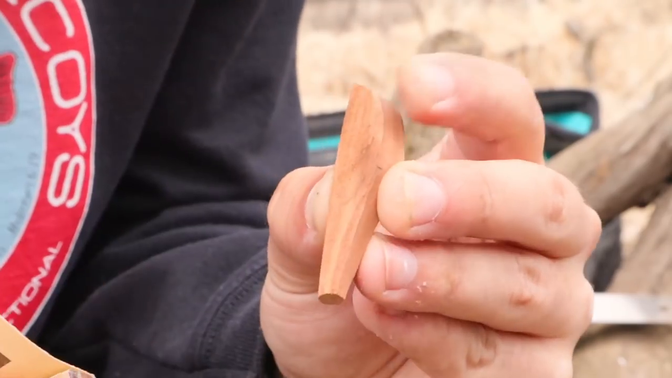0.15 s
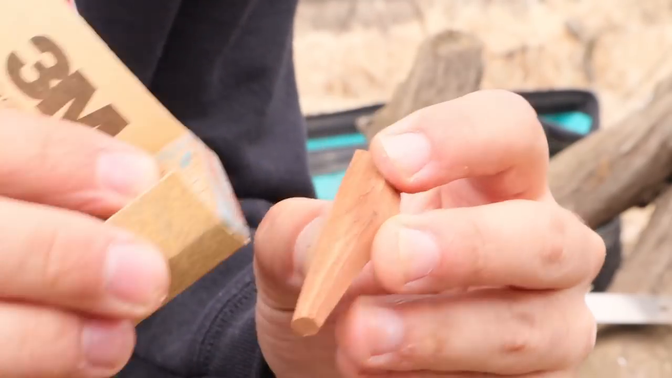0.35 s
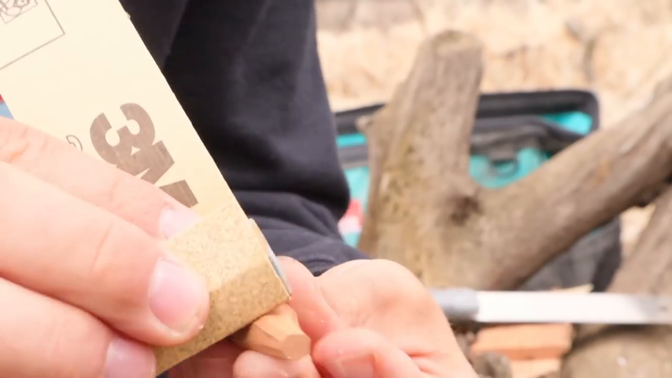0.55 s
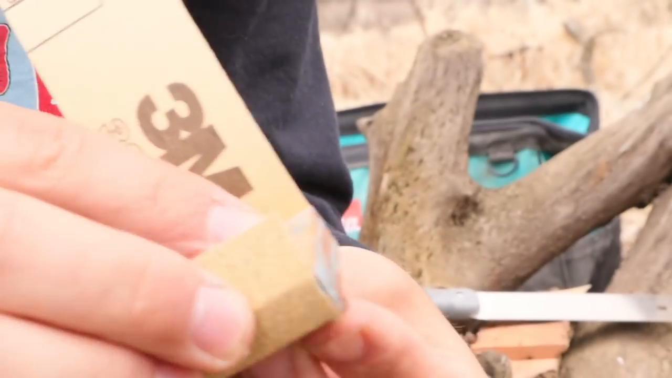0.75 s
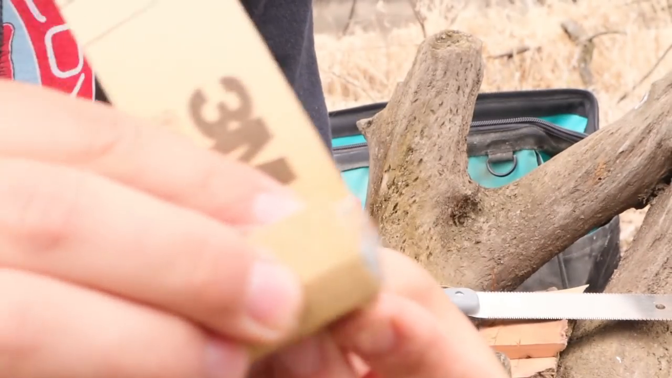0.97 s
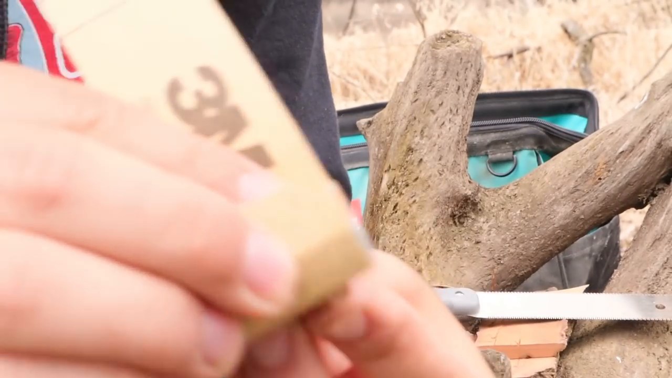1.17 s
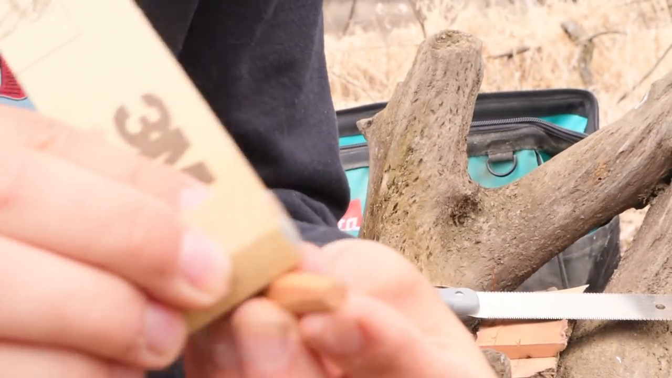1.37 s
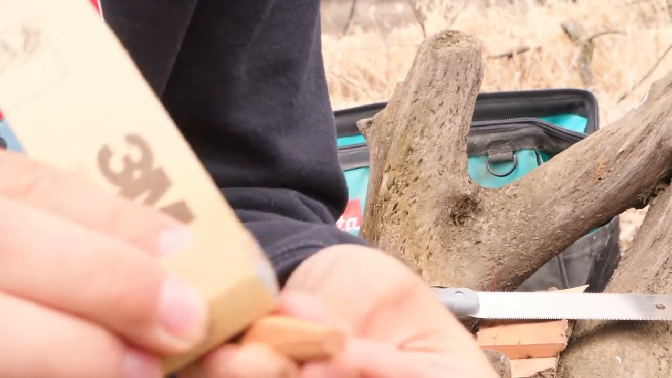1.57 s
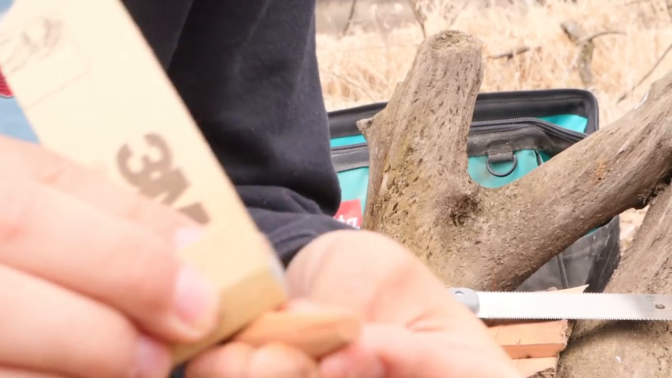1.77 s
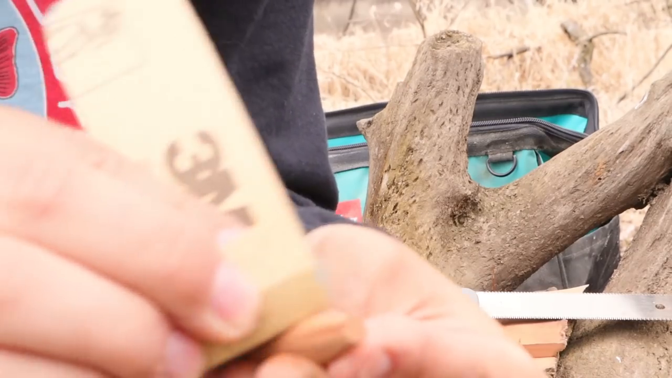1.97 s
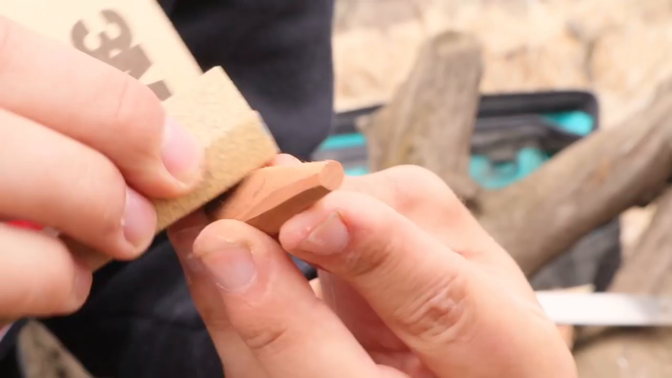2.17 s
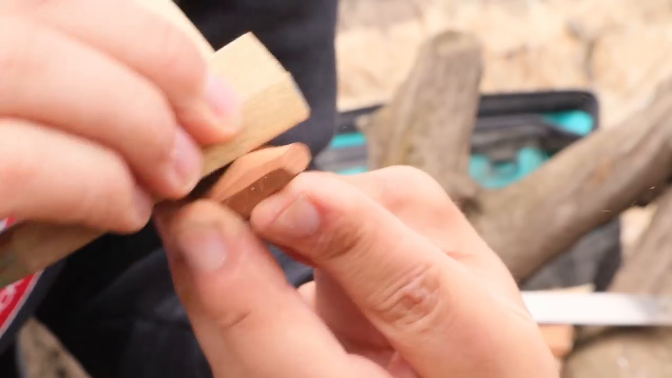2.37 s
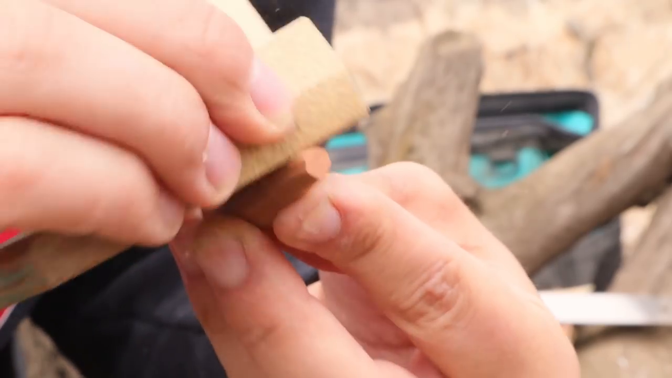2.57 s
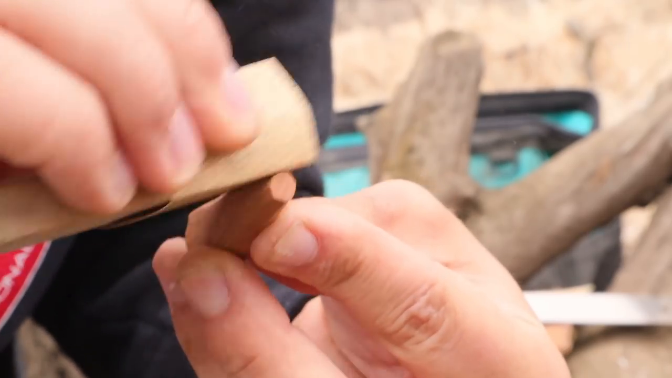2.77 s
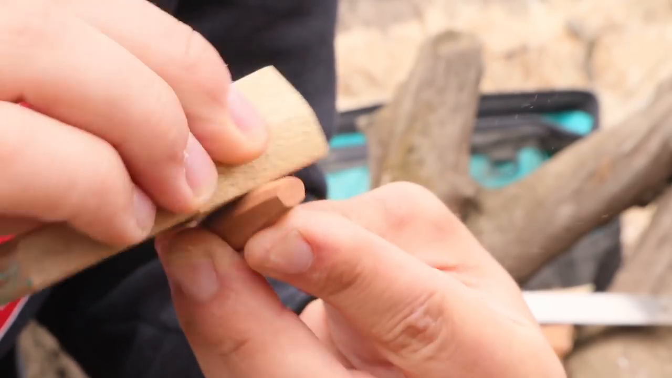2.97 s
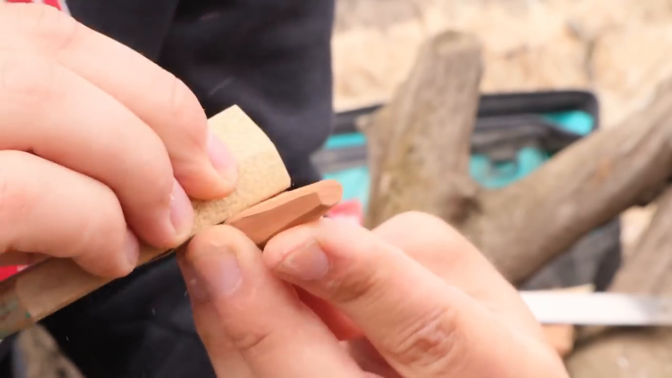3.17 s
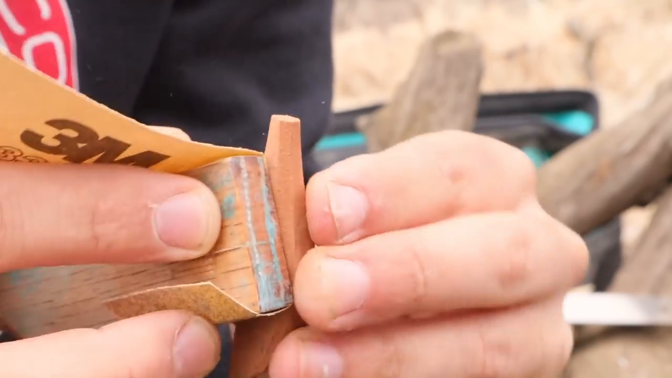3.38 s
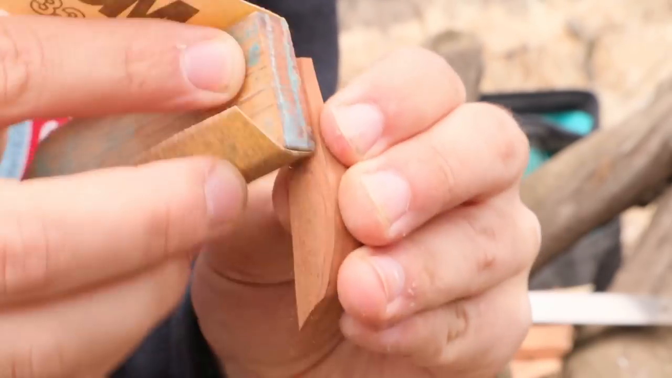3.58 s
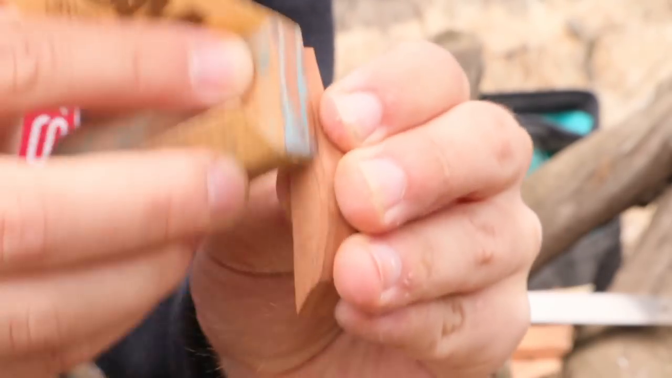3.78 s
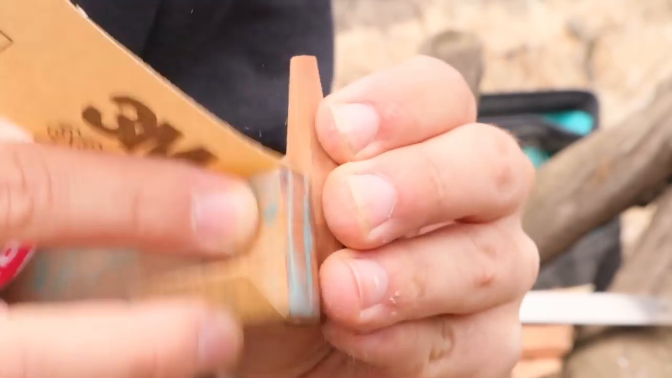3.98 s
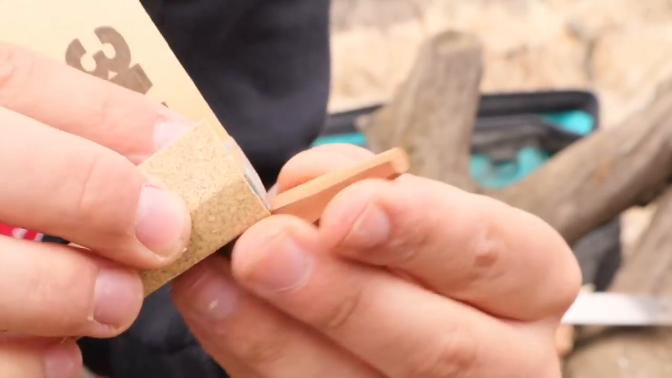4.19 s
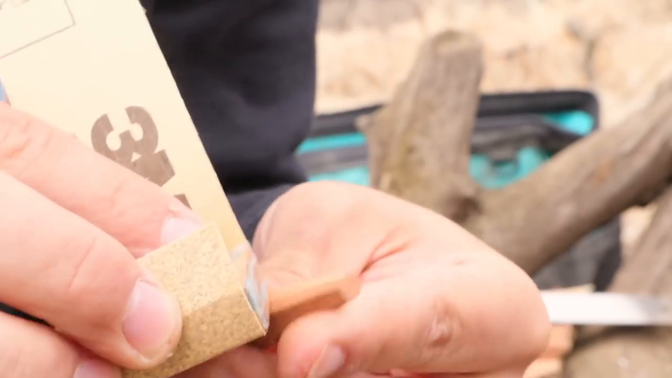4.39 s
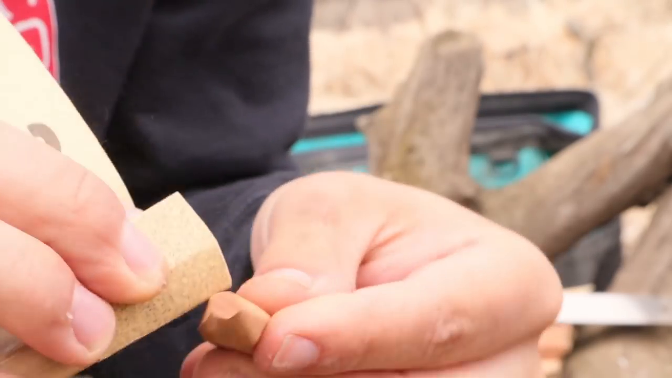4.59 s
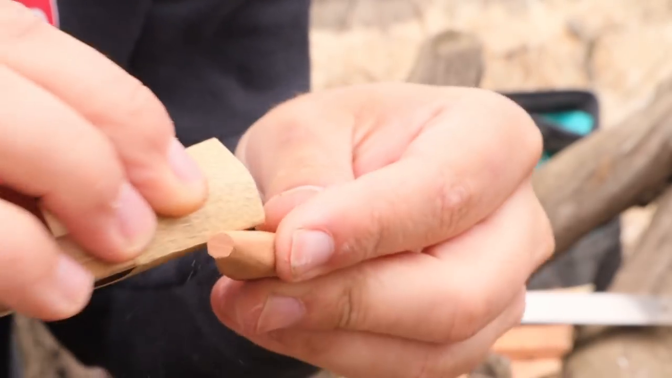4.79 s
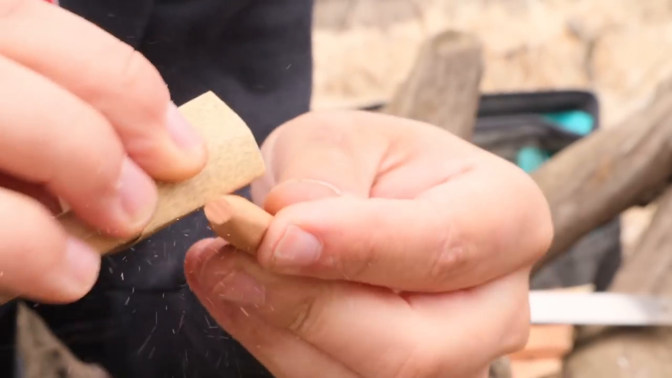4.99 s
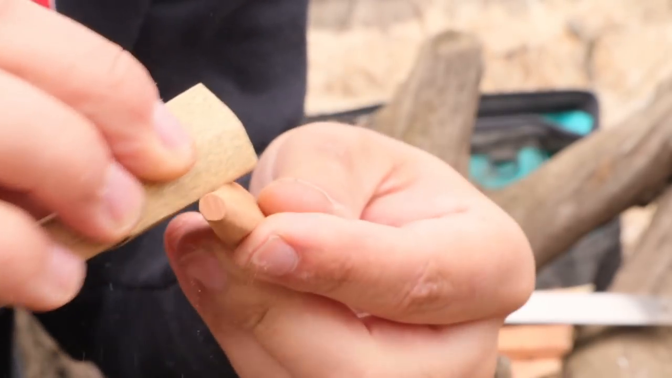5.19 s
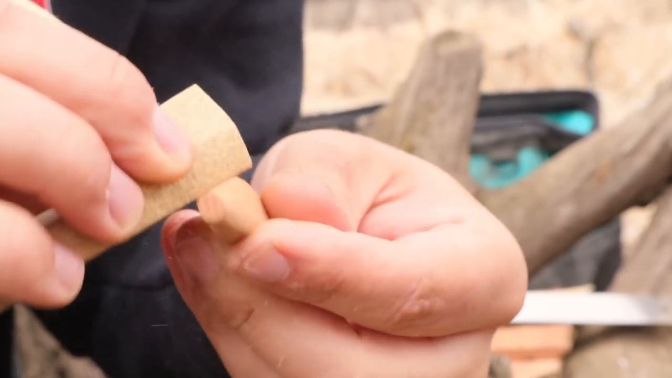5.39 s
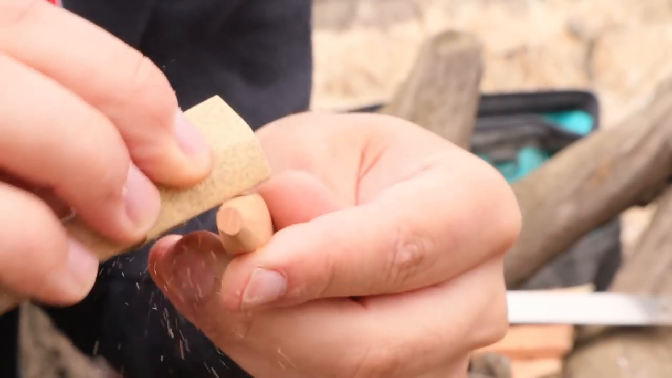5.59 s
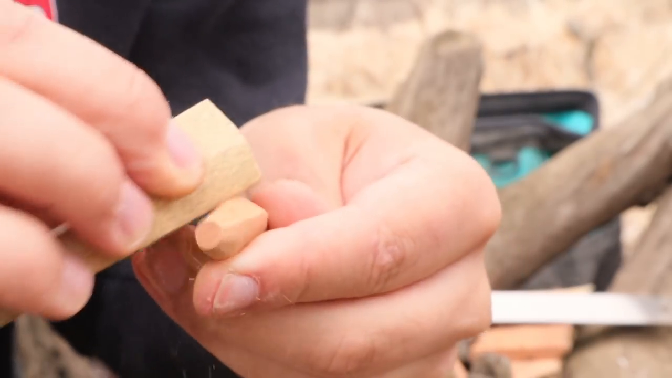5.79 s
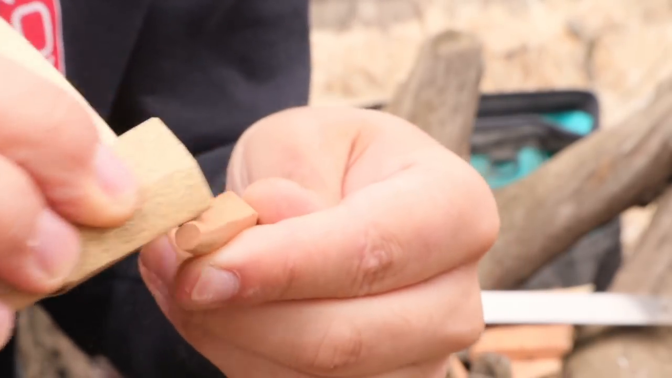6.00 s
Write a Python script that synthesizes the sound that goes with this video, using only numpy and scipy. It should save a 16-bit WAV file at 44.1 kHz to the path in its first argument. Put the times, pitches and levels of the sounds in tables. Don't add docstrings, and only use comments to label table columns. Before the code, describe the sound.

Folded sandpaper rasps a small wooden peg in very rapid, sped-up strokes, with brief pauses and ticks, over faint outdoor traffic wash.

```python
import sys
import numpy as np
from scipy import signal
from scipy.fft import rfft, irfft, next_fast_len
from scipy.io import wavfile
from scipy.ndimage import uniform_filter1d

SR = 44100
rng = np.random.default_rng(int(sys.argv[2]) if len(sys.argv) > 2 else 0)


def ratio_of_db(decibels):
    return 10 ** (np.asarray(decibels, float) / 20)


def unload_wav(signal):
    wavfile.write(
        sys.argv[1],
        SR,
        np.round(np.clip(np.atleast_2d(signal).T, -1, 1) * 32767).astype(np.int16),
    )


N = 266672


def evened(x):
    return x / np.sqrt(np.mean(x ** 2) + 1e-20)


def read_spectrum(points, hz):
    f, value = np.transpose(points)
    return np.interp(np.log(hz + 1), np.log(f + 1), value)


def level_curve(rows):
    s, db = np.transpose(rows)
    return ratio_of_db(np.interp(np.arange(N) / SR, s, db))


def shaped(x, gain):
    size = next_fast_len(len(x))
    hz = np.fft.rfftfreq(size, 1 / SR)
    return irfft(rfft(x, size) * gain(hz), size)[:len(x)]


def noise(gain):
    return evened(shaped(rng.standard_normal(N), gain))


def wobble(lo_hz, hi_hz):
    return noise(lambda f: (f > lo_hz) / (1 + (f / hi_hz) ** 2))


def octave(hz, lo_hz, hi_hz, order=300):
    hz = np.clip(hz, lo_hz / 2, hi_hz * 2)
    return 1 / np.sqrt((1 + (lo_hz / hz) ** order) * (1 + (hz / hi_hz) ** order))


def add(mix, s, sound):
    part = mix[round(s * SR):][:len(sound)]
    part += sound[:len(part)]


# frequency in Hz, level in dB per Hz.
WASH_SPECTRUM = [(30, -10), (70, 2.5), (130, -1), (325, -9), (543, -11), (850, -7), (1300, -12),
                 (1700, -18), (2200, -20), (2450, -32.5), (15900, -34)]
# time in seconds, level in dB.
ENGINE_LEVEL = [
    (0, -57),
    (2.1, -53),
    (2.4, -48),
    (3.2, -47),
    (3.7, -56),
    (4.1, -41.5),
    (4.6, -45.5),
    (5.1, -46),
    (5.3, -69),
    (6.05, -48.5),
]
# time in seconds, level in dB.
WIND_LEVEL = [
    (0, -62),
    (2.05, -65),
    (2.2, -46),
    (2.5, -60),
    (6.05, -65),
]


def outdoors():
    wash_db, engine_hz, wind_hz = -45.5, 87.4, 38
    wash = noise(lambda f: ratio_of_db(read_spectrum(WASH_SPECTRUM, f)) * np.minimum(f / 45, 1) ** 2)
    fuzz = noise(lambda f: 1 / (1 + ((f - engine_hz) / 14) ** 2))
    wavering_hz = engine_hz + 4 * wobble(.5, 3.5)
    drone = np.sin(2 * np.pi * np.cumsum(wavering_hz) / SR) + .5 * fuzz
    wind = noise(lambda f: (f / wind_hz) ** 2 / (1 + (f / wind_hz) ** 4))
    wash = ratio_of_db(wash_db + 1.8 * wobble(.3, 27)) * wash
    return wash + level_curve(ENGINE_LEVEL) * drone + level_curve(WIND_LEVEL) * wind


def grit(tears_per_s=12000, spread_db=2.5, hiss=1.0, patchy_db=3.0):
    size_db = spread_db * np.minimum(rng.exponential(1, N), 5)
    size = ratio_of_db(size_db) * rng.choice([-1., 1.], N)
    tears = evened(size * (rng.random(N) < tears_per_s / SR))
    tears = tears + hiss * rng.standard_normal(N)
    z = signal.stft(tears, nperseg=256)[2]
    patches = uniform_filter1d(rng.standard_normal(z.shape[::-1]).T, size=4, axis=0)
    patches = evened(uniform_filter1d(patches, size=6, axis=1))
    return signal.istft(z * ratio_of_db(patchy_db * patches), nperseg=256)[1][:N]


def turns_db(s, db, length, splice, lean=0.42):
    t = np.arange(0, N, 44) / SR
    s, db = s[:, None], db[:, None]
    edge = splice * (2.5 - lean * np.sign((t - s) * db))
    shape = np.clip((length / 2 - abs(t - s)) / edge + .5, 0, 1)
    return np.interp(np.arange(N) / SR, t, uniform_filter1d((db * shape).sum(0), size=5))


# start in
# seconds, pressure in dB, brightness in dB, stop before it in dB.
FIRST_TOUCHES = [(0.0, -29, 4.5, -6.5), (0.023, -31, 3.5, -5), (0.066, -45, -8, 2), (0.085, -70, -11, -13),
                 (0.41, -47, -7, 1.5), (0.433, -30.5, -7, 4.5), (0.462, -54.5, 0, -13),
                 (0.505, -65.1, -3.5, -1), (0.555, -49.5, -3, -2), (0.585, -58, 0, -6),
                 (0.63, -55.5, 6, -3), (0.655, -57, -4.2, -4.0), (0.68, -39, -0.5, -6),
                 (0.714, -32.5, -0.5, 0), (0.745, -35, 1, -0.5)]
LONG_STROKES = [(0.814, -34.5, 0, -14.5), (0.881, -32.5, 1, -11), (0.955, -34.5, 1.3, -13),
                (1.062, -30.5, -0.5, -11.0), (1.133, -32.5, 1, -5.5), (1.205, -33.2, 0, -6),
                (1.275, -34, 1.2, -7.5), (1.348, -30.5, 1.5, -7), (1.415, -31, 1.4, -5),
                (1.488, -34.5, -1.5, -9), (1.551, -32, 3, -10.0), (1.622, -35, 2.5, -1.5),
                (1.697, -31, 0, -10.0), (1.774, -31.7, 1, -21), (1.809, -31.2, 1.5, -6.5),
                (1.878, -28, -0.8, -10), (1.947, -29, 1.0, -5.5), (2.013, -32, -1.5, -9.5),
                (2.086, -28, 0.2, -9.5), (2.132, -24, -3, -5.5), (2.16, -30, 4.5, -5.5)]
LATER_FLAT_STROKES = [(2.249, -33, 4, -27), (2.307, -27.6, 1.5, -8), (2.375, -31.5, 1, -1.5),
                      (2.423, -31, 2.5, -2.5), (2.48, -28, 0.5, 0), (2.522, -28, 2.2, -5),
                      (2.569, -30.5, 1.3, -6.5), (2.612, -30.5, 1.7, -6.0), (2.68, -31, -1.5, -2.0),
                      (2.75, -35.5, 0.8, -0.5), (2.818, -39.5, -1.5, -12.5), (2.858, -38, 1.1, -1.5),
                      (2.907, -33, -4, -2.5), (2.957, -31, 2.1, -3), (2.997, -33.5, 2, -1.5),
                      (3.039, -27.5, 0.8, -8.5), (3.064, -30.5, 3.5, -13), (3.117, -47, -4, -4.5),
                      (3.151, -34.5, -7.5, -18.0), (3.207, -34, 8, -5.5), (3.261, -32.5, 7.8, 3.5),
                      (3.31, -30.5, 2, 1), (3.356, -57, -10, -7), (3.385, -41.5, -7, -1.5),
                      (3.415, -55.5, -4, -4), (3.45, -57.5, -7, 3)]
UPRIGHT_STROKES = [(3.497, -39.5, 0, -4.5), (3.526, -40, -4.5, -9.0), (3.56, -35.5, -2, -1.5),
                   (3.606, -33.5, -2.1, -3.5), (3.662, -32, -1, -5.5), (3.716, -30.5, -4.5, -11),
                   (3.769, -31.5, 0, -8.5), (3.827, -28.5, -5, -13), (3.884, -33.5, -1.5, -7),
                   (3.935, -33.5, -1, 0.5), (3.994, -36.5, 0, -9), (4.045, -56, -4, -5.5),
                   (4.062, -61.5, -12, 0), (4.19, -44.5, -1, -2), (4.214, -42, -2, -6),
                   (4.24, -42, -0.5, -5.5), (4.275, -38.4, -1.3, -1), (4.316, -42.5, -2.5, -5),
                   (4.36, -60, -0.5, -7), (4.4, -55.5, -6, 1), (4.442, -54.5, -2.3, -3),
                   (4.49, -61.5, -6, 0)]
TIP_STROKES = [(4.61, -48, -6, -3), (4.64, -41.5, 2, -1), (4.693, -38, 1, -7), (4.76, -36, 2.2, -3.5),
               (4.834, -33, 1, -8.5), (4.885, -32.5, -0.1, -5), (4.935, -34.5, 1.3, -1),
               (5.009, -35.5, 3, -11), (5.078, -34.5, -0.2, -3.5), (5.118, -33, -0.2, -3.5),
               (5.177, -33, 0.5, -11), (5.233, -34.1, -1, -8), (5.313, -35.5, -1.5, -9.5),
               (5.386, -32.5, 3, -3.5), (5.438, -28.5, -4, -8.5), (5.474, -33.0, 1, -4.5),
               (5.551, -34, -0.0, -8), (5.617, -35, 2.5, -3), (5.682, -32, -3, -5),
               (5.735, -34.1, -4.5, -7.5), (5.783, -34.5, 1.2, -2.5), (5.857, -36.5, -1, -1),
               (5.917, -36, 2, -5), (5.988, -35, 2.3, -1.5), (6.035, -38, -7, -2.5)]
# time in seconds, grit level in dB, dust fizz level in dB.
EARLY_SKIPS = [(0.739, -7, -15), (0.786, -13, 0), (0.856, -1, -4), (0.928, -1.5, -13), (0.992, -9, -2),
               (1.032, -9, 1), (1.108, -11.0, -2), (1.182, -3, -6.0), (1.251, -3, -2), (1.32, -10.0, -3),
               (1.393, -4.0, -10.0), (1.536, 4, 0), (1.6, -5, -11), (1.669, -4, -4), (1.744, -7, -1),
               (1.848, -3.5, -7), (1.985, -7, 0), (2.056, -7, 1), (2.237, -9, -15)]
LATE_SKIPS = [(3.019, -2, 3), (3.235, -1, -8), (3.283, -5, 1), (3.335, -5, -6), (3.58, -6, -2),
              (3.861, -6, -3), (3.917, 0, -4), (4.03, -8, 0.5), (4.723, -3, -3), (4.815, -14, 0),
              (4.973, -11, -4), (5.061, -10, -4), (5.268, -3, -4), (5.362, -6, -1), (5.655, -11, -7),
              (5.825, -10, -2), (5.935, -7, -2)]
PRESS_SHARE = [0.82, 0.95, 0.96, 0.99, 0.94]
BRIGHT_SHARE = [0.032, -0.77, 0.19, 1, .99]
STOP_SHARE = [0.44, 1.33, 1.41, 2.42, 1.75]
# length, lag and easing of a stop, and crossfade at a turn, all in seconds.
STOP_S = [0.024, 0.017, 0.017, 0.013, 0.014]
LAG_S = [0.0074, 0.0096, 0.0029, .0005, 0.00047]
EASE_S = [0.011, 0.032, 0.013, 0.0088, .007]
CROSSFADE_S = [0.0098, 0.0085, 0.0058, 0.0029, 0.0016]
# one grip, with the level of every octave, low to high, in dB.
GRIP_DB = [
    (-14, -5.5, 0.14, -2, -10),
    (-15.5, -7, 0.1, 0, -11),
    (-13.5, -7.5, 0.1, -1, -14),
]
# time in seconds, length in seconds, level in dB.
SPLICES_KNOCK = [
    (.932, 0.044, -8),
    (1.928, 0.019, -12),
    (2.618, 0.014, -14),
    (4.67, 0.13, 8),
]
SPLICES_PEG = [(0.08, 0.024, -7), (0.732, 0.034, -19), (0.878, 0.038, -11), (0.972, 0.021, 7),
               (1.932, 0.022, -7), (2.053, 0.036, -5), (2.261, 0.018, 19), (2.734, 0.024, -16),
               (2.943, 0.076, -10), (3.001, 0.075, 6.5), (3.255, 0.056, -12), (3.402, 0.052, -2),
               (5.007, 0.018, -20), (5.041, 0.022, 13.5), (5.076, 0.016, -7), (5.669, 0.036, -12),
               (5.937, 0.024, -12), (5.986, 0.057, 8)]
SPLICES_PAPER = [(.446, 0.0069, -3), (0.719, 0.012, -26), (1.353, .013, -9), (2.005, 0.05, -6.5),
                 (2.225, 0.039, -13), (3.192, 0.015, 2), (3.235, 0.014, -9), (3.262, 0.009, -3),
                 (3.49, .036, -6), (4.272, 0.018, -17), (4.693, 0.04, -8), (5.96, 0.0091, 6)]
SPLICES_GRIT = [(1.692, 0.028, 5), (2.075, 0.019, 11.5), (3.107, 0.0081, -18), (3.192, 0.017, 15.5),
                (3.232, 0.01, -23), (3.263, 0.0075, -23), (3.927, 0.019, -22), (4.985, 0.016, -16),
                (5.627, 0.027, -8), (5.837, 0.0083, -19)]
SPLICES_FIZZ = [(.456, .02, -11), (.766, .036, -10), (.958, .024, -13), (1.942, .05, -6), (2.037, .033, -7),
                (2.259, .029, -12), (2.638, .036, -10), (2.961, .01, -17), (3.107, .009, -17),
                (3.173, .047, 10.5), (3.262, 0.0089, -18), (4.937, .016, -15)]


def hand_db(k, held):
    strokes = FIRST_TOUCHES + LONG_STROKES + LATER_FLAT_STROKES + UPRIGHT_STROKES + TIP_STROKES
    s, press_db, bright_db, stop_db = np.transpose(strokes)
    start = s + LAG_S[k]
    stroke = np.maximum(np.searchsorted(start, np.arange(N) / SR) - 1, 0)
    db = (PRESS_SHARE[k] * press_db + BRIGHT_SHARE[k] * bright_db)[stroke]
    db = uniform_filter1d(db, max(round(EASE_S[k] * SR), 1), mode="nearest")
    db = db + np.array(GRIP_DB)[held, k]
    db = db + turns_db(start, STOP_SHARE[k] * stop_db, STOP_S[k], CROSSFADE_S[k])

    splices = (SPLICES_KNOCK, SPLICES_PEG, SPLICES_PAPER, SPLICES_GRIT, SPLICES_FIZZ)[k]
    at_s, length, splice_db = np.transpose(splices)
    db = db + turns_db(at_s, splice_db, length[:, None], CROSSFADE_S[k])

    top_octave = k - (len(STOP_S) - 2)
    if top_octave >= 0:
        skip_s, *skip_db = np.transpose(EARLY_SKIPS + LATE_SKIPS)
        skip_length_s, skip_share = 0.011, 2.85
        db = db + turns_db(skip_s, skip_share * skip_db[top_octave], skip_length_s, CROSSFADE_S[k])
    return db


OCTAVE_HZ = [300, 1420, 2620, 5400, 10850, 16000]
CHATTER_DB = [1.29, 1.5, 1.43, 2.13, 2.5]
# frequency in Hz, level in dB per Hz.
RASP = [(400, -20), (650, -11), (1200, -3), (3100, -1.5), (5200, -1), (7400, -8.5), (10700, -7.5),
        (14000, -11.5), (15800, -17.5)]
GRIP_S = [3.45, 4.55]
# frequency in Hz, width in Hz, height in dB.
GRIP_FLAT = [(1263, 340, 6.3), (3090, 94, 4.6), (5184, 130, 6.3), (5880, 83, 8.8), (6760, 55, 0.78),
             (10800, 320, 0.9)]
GRIP_UPRIGHT = [(1650, 130, 3.9), (1970, 190, 4.1), (3930, 1700, 7.3), (4880, 210, 3.3), (6000, 570, 7.4),
                (6800, 260, 4.8)]
GRIP_TIP = [(1380, 500, 8.1), (2790, 310, 6.1), (3880, 550, 5.1), (5360, 1300, 5.1), (6880, 220, 6.1),
            (9300, 740, 3.9)]


def ring_peg(tears, grip):
    def gain(hz):
        modes_db = sum(db / (1 + (2 * (hz - f) / width) ** 2) for f, width, db in grip)
        return ratio_of_db(read_spectrum(RASP, hz) + modes_db)
    return shaped(tears, gain)


def sanding():
    tears = grit()
    held = np.searchsorted(GRIP_S, np.arange(N) / SR)
    rung = [ring_peg(tears, grip) for grip in (GRIP_FLAT, GRIP_UPRIGHT, GRIP_TIP)]
    shared = wobble(4.2, 40)
    out = np.zeros(N)
    for k in range(len(STOP_S)):
        lo_hz, hi_hz = OCTAVE_HZ[k:k + 2]
        bands = [evened(shaped(r, lambda hz: octave(hz, lo_hz, hi_hz))) for r in rung]
        chatter_db = CHATTER_DB[k] * (wobble(19, 82) + 0.95 * shared)
        out += np.choose(held, bands) * ratio_of_db(hand_db(k, held) + chatter_db)
    return out


# start in seconds, length in seconds, first pitch in Hz, last pitch in Hz, level in dB.
CHIRPS = [
    (.28, 0.034, 2210, 2200, -54),
    (.31, .03, 4300, 4050, -58),
    (4.44, .045, 4250, 4700, -62),
]


def birds():
    out = np.zeros(N)
    for s, length, from_hz, to_hz, db in CHIRPS:
        hz = np.linspace(from_hz, to_hz, round(length * SR))
        whistle = np.sin(2 * np.pi * np.cumsum(hz) / SR)
        add(out, s, ratio_of_db(db) * np.hanning(len(hz)) * whistle)
    return out


# start in seconds, level in dB, lowest Hz, highest Hz.
TICKS = [(0.404, -42.5, 2220, 2580), (0.497, -39.5, 1000, 4800), (0.592, -31, 5440, 15000),
         (0.5965, -39, 2700, 5240), (0.614, -40, 2660, 5300), (3.418, -40.5, 5400, 10600),
         (4.081, -26, 3360, 15800), (4.185, -45, 8000, 15500), (4.223, -30, 4800, 5170),
         (4.406, -44, 2600, 12000), (4.598, -34, 970, 6260), (3.506, -40, 2600, 10500),
         (4.257, -37, 4300, 5100), (4.659, -28.5, 4670, 6360)]


def ticks():
    out = np.zeros(N)
    t = np.arange(400) / SR
    rise = np.minimum(t / .001, 1)
    decay_db = -60 * np.maximum(t - .003, 0) / .012
    for s, db, lo_hz, hi_hz in TICKS:
        snap = rng.standard_normal(len(t))
        snap = evened(shaped(snap, lambda hz: octave(hz, lo_hz, hi_hz, order=24)))
        add(out, s, ratio_of_db(db + decay_db) * rise * snap)
    return out


def scene():
    return (outdoors() + sanding() + birds() + ticks())[None]


def roll_off(x):
    return signal.sosfilt(signal.butter(12, 16450, fs=SR, output="sos"), x)


def record(dry):
    low_pass = signal.firwin(1023, 15790, window=("kaiser", 9), fs=SR)
    limited = signal.oaconvolve(dry, low_pass[None], "same")
    return roll_off(limited)


dry = scene()
out = record(dry)
unload_wav(out)
```